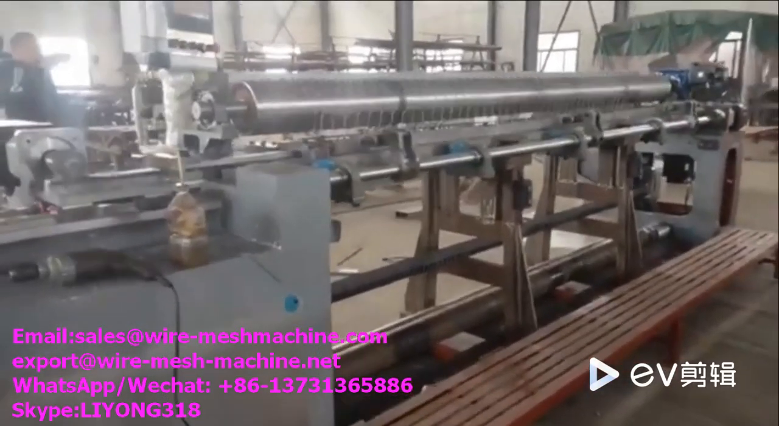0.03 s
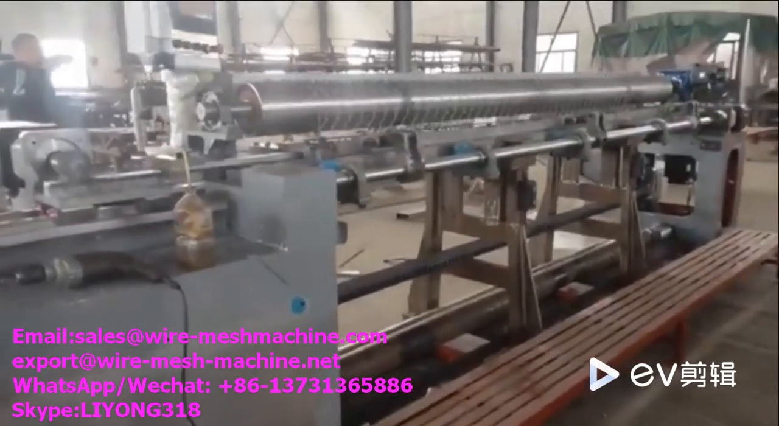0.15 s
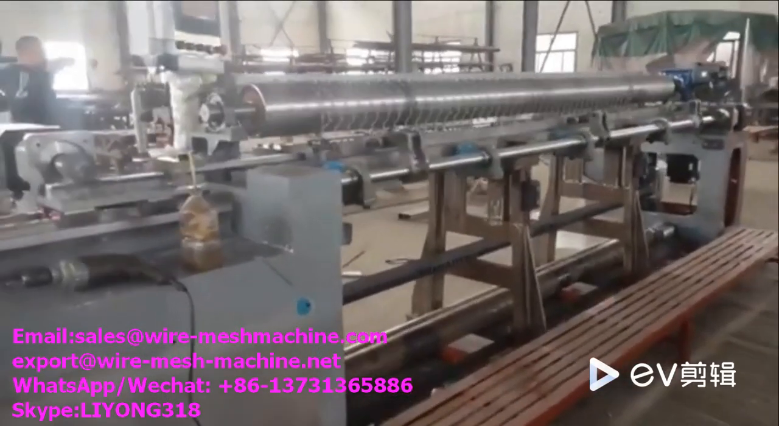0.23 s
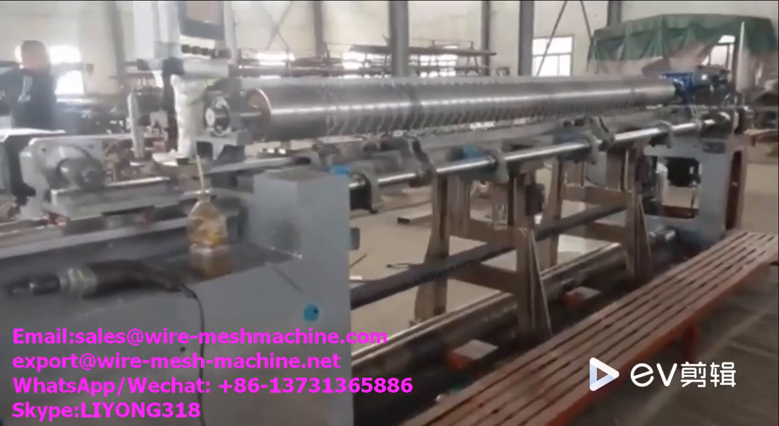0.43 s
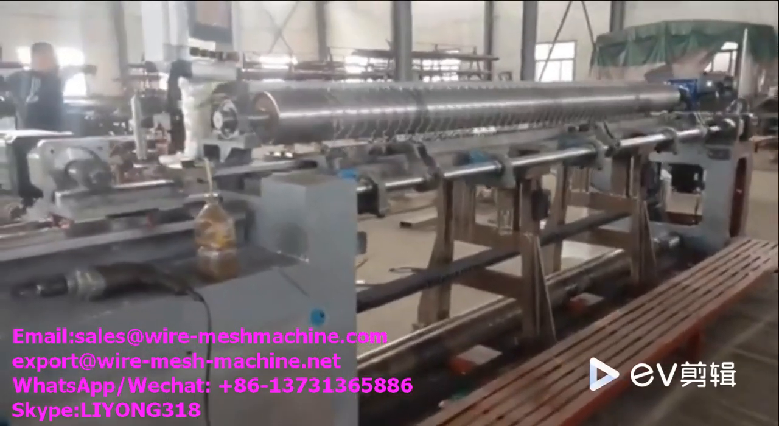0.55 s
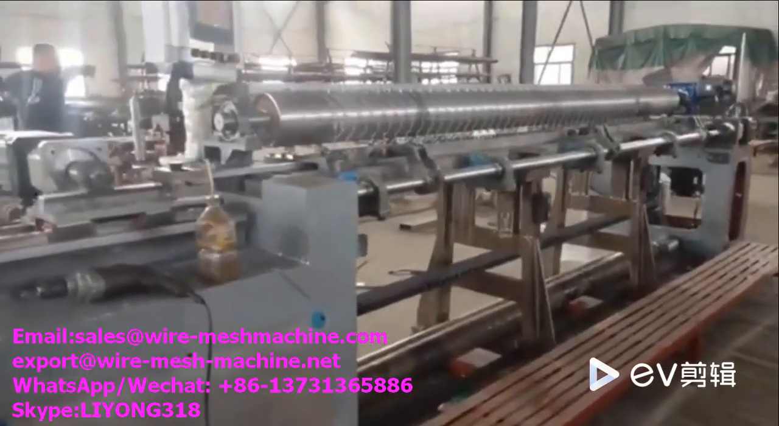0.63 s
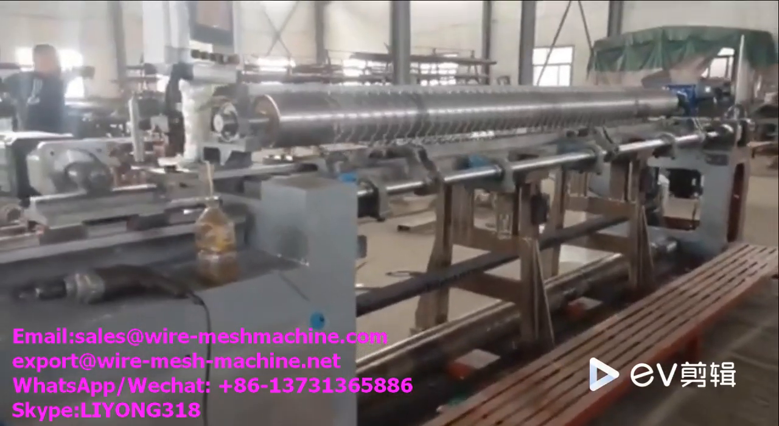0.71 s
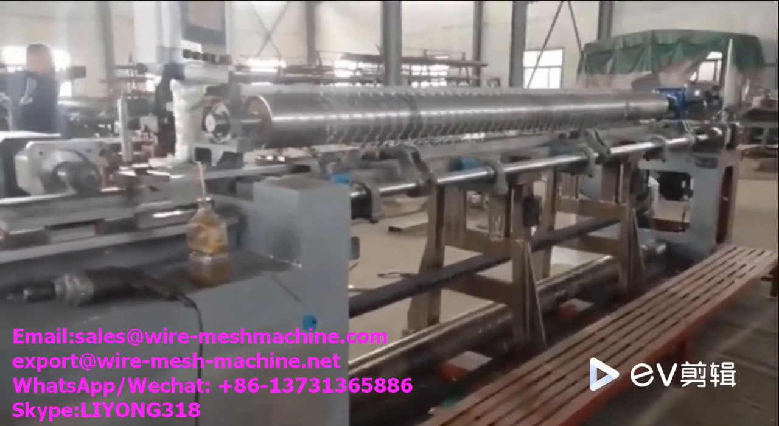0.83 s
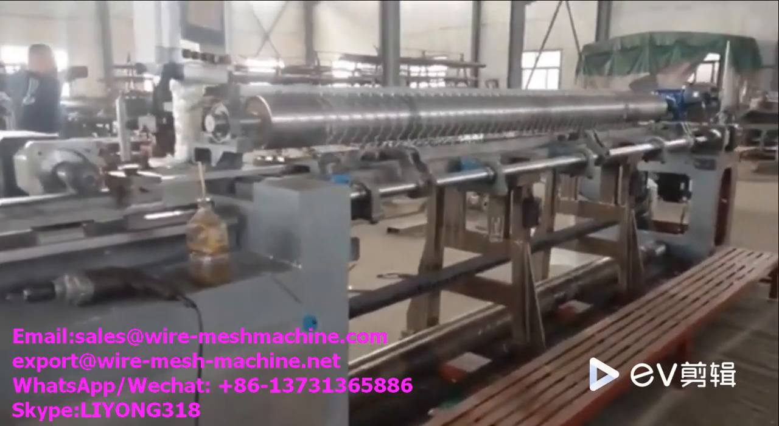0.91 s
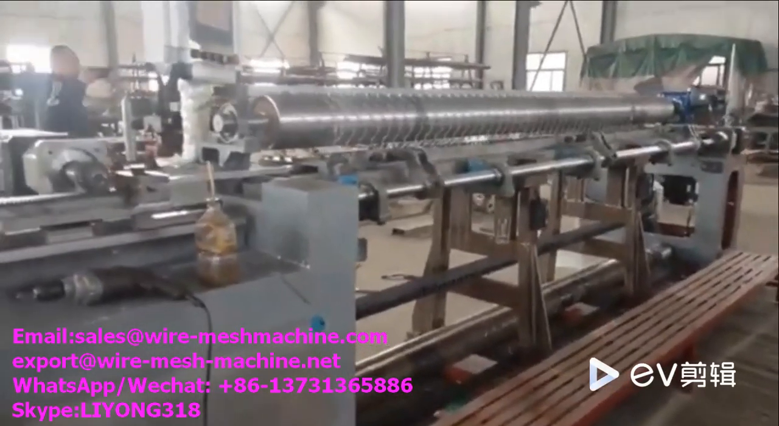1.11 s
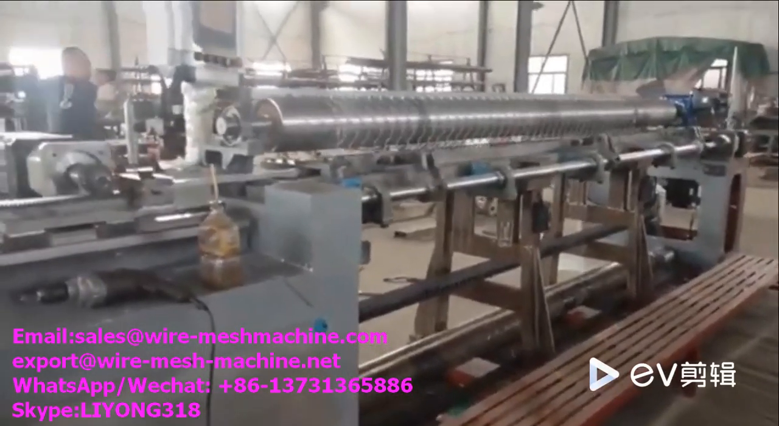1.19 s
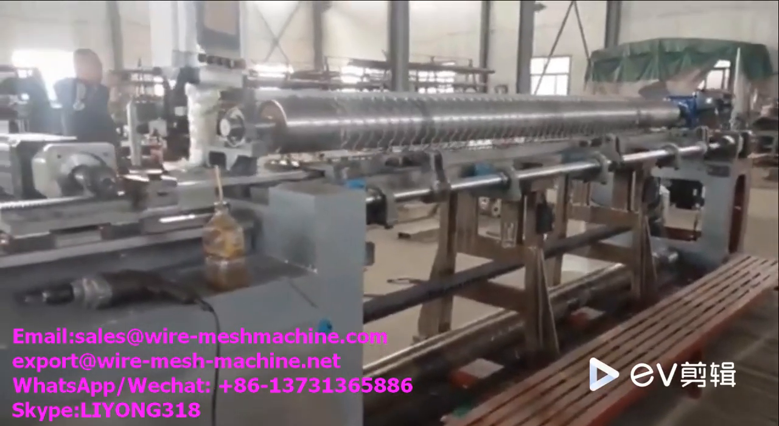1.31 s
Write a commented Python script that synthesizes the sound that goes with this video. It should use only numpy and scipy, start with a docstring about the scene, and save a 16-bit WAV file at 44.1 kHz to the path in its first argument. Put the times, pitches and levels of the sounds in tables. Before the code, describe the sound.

A pneumatic factory machine vents air in a large, echoing workshop. Distant motors hum and rumble throughout. Around 0.2 s a thin, unsteady high whistle chirps, swelling by 0.28 s into a harsh, hoarse air blast, loudest near 0.4 s, with a dull sliding rumble early on. At 0.59 s a heavy metallic thud lands; hiss stops by 0.75 s. Echoes decay, and a light double-knock rattles at 1.23 s.

```python
"""A large workshop hall hums over a deep rumble: coloured noise and wavering motor tones.
Then an air valve on a wire machine opens: it leaks, whistles (sine tones on moving pitches) and vents
a harsh jet (noise shaped by pipe resonances) until the piston thuds home and rings the machine frame.
The hall rings on as decaying noise, and a loose part knocks late."""
import sys
import numpy as np
from scipy import signal
from scipy.fft import rfft, irfft, next_fast_len
from scipy.io import wavfile
from scipy.ndimage import uniform_filter1d, map_coordinates

SR = 44100
rng = np.random.default_rng(int(sys.argv[2]) if len(sys.argv) > 2 else 0)


def put_to_file(sound):
    """Save the sound as 16-bit audio at rate SR, in the file named by the first command-line argument."""
    columns = np.atleast_2d(sound).T  # one column per channel
    safe = np.clip(columns, -1, 1)
    whole_steps = np.round(safe * 32767)
    wavfile.write(sys.argv[1], SR, whole_steps.astype(np.int16))


def voltage_ratio(decibels):
    """Convert decibels (scalar or array-like) to amplitude ratios, 20 dB per decade."""
    exponent = np.asarray(decibels, float) / 20
    return 10 ** exponent


N = 59535  # length in samples, 1.35 s


def unit(x):
    """Scale to rms 1."""
    return x / np.sqrt(np.mean(x ** 2) + 1e-20)


def along(points, hz):
    """Read a curve of (Hz, value) points on a log frequency axis."""
    point_hz, value = np.transpose(points)
    return np.interp(np.log(hz + 1), np.log(point_hz + 1), value)


def curves(rows):
    """One value per sample for each column after the time."""
    start_s, *columns = np.transpose(rows)
    return [np.interp(np.arange(N) / SR, start_s, column) for column in columns]


def wobble(rate):
    """A smooth random curve with rate knots a second."""
    knots = rng.standard_normal(int(N * rate / SR) + 4)
    return map_coordinates(knots, [np.arange(N) * rate / SR])


def filtered(x, response):
    """Multiply the spectrum of x by a response of frequency."""
    size = next_fast_len(N + SR // 2)
    return irfft(rfft(x, size) * response(np.fft.rfftfreq(size, 1 / SR)), size)[..., :N]


def smooth_patches(shape, bins, frames):
    """A random field over frequency and time, averaged into patches."""
    field = uniform_filter1d(rng.standard_normal(shape), size=bins, axis=0)
    return unit(uniform_filter1d(field, size=frames, axis=1))


def rush(spectrum, patchy_db):
    """Coloured noise of rms 1 with patches of random gain."""
    z = signal.stft(rng.standard_normal(N), nperseg=512)[2]
    patches = smooth_patches(z.shape, 5, 5)
    noise = signal.istft(z * voltage_ratio(patchy_db * patches), nperseg=512)[1][:N]
    return unit(filtered(noise, lambda hz: voltage_ratio(along(spectrum, hz))))


def narrow(hz, width):
    """Noise of rms 1 in one resonance, at half amplitude width Hz to either side."""
    return unit(filtered(rng.standard_normal(N), lambda f: 1 / (1 + ((f - hz) / width) ** 2)))


# colour of the far machines' roar: (pitch_hz, relative level_db per Hz)
HUM = [(15, -62), (25, -31), (59, -8.5), (178, -10), (229, -9), (254, -9), (327, -7), (505, -10),
       (685, -17), (862, -9.5), (1170, -17.5), (4180, -30), (4510, -38.5), (6960, -24), (11000, -50.5),
       (14300, -76), (22000, -120)]
# steady motor tones: (pitch_hz, drift_hz, level_db before the fade below)
MOTORS = [(227.4, 3.23, -56.5), (835.6, 2.63, -56.5)]
# far whine: (pitch_hz, width_hz, level_db before the fade below)
WHINE = (6550, 250, -68)
# deep rumble, lowered by RUMBLE_TRIM_DB: (start_s, level_db)
RUMBLE = [(0.0, -39.5), (0.036, -51.5), (0.566, -54), (0.604, -39.5), (0.816, -55), (0.924, -44.5),
          (1.35, -50.5)]
# slow rise and fall of the hum: (start_s, roar gain_db, motor and whine gain_db)
HUM_FADE = [(0, -0.5, -0.5), (.25, 2, 3.5), (.45, -3, -4.5), (1.1, 1, -4), (1.35, -6.5, -7)]
HUM_DB, RUMBLE_TRIM_DB = -45.5, -3.5


def hum():
    """Far machines: a noise roar, two wavering motor tones, a whine and a rumble that comes and goes."""
    roar = voltage_ratio(HUM_DB + 0.67 * wobble(5.95)) * rush(HUM, patchy_db=2.5)
    tones = voltage_ratio(WHINE[2]) * narrow(*WHINE[:2])
    for hz, drift_hz, level_db in MOTORS:
        phase = 2 * np.pi * np.cumsum(hz + drift_hz * wobble(15.34)) / SR
        tones = tones + np.sqrt(2) * voltage_ratio(level_db + 2.3 * wobble(12.1)) * np.sin(phase)
    rumble_db, = curves(RUMBLE)
    rumble_colour = [(20, -32), (40, -5.5), (75, -2), (110, -7), (200, -28), (400, -87)]  # (Hz, dB)
    deep = rush(rumble_colour, patchy_db=-2.5)
    roar_db, tones_db = curves(HUM_FADE)
    return voltage_ratio(roar_db) * roar + voltage_ratio(tones_db) * tones + voltage_ratio(rumble_db + RUMBLE_TRIM_DB) * deep


# how long the hall rings: (pitch_hz, time to fall 60 dB in s)
HALL = [(100, 6.7), (300, 2.17), (1000, 3.36), (3000, 1.81), (6500, 1.21), (11000, 2.13)]
HALL_DELAY_S = 0.02


def hall(x):
    """Echoes blur into a noise tail in which each frequency dies at its own speed."""
    hz, t, z = signal.stft(rng.standard_normal(N), SR, nperseg=256)
    decay = voltage_ratio(-60 * t / along(HALL, hz)[:, None])
    tail = signal.istft(z * decay, SR, nperseg=256)[1]
    delayed = np.pad(x, (round(HALL_DELAY_S * SR), 0))
    return signal.fftconvolve(delayed, tail / np.linalg.norm(tail))[:N]


# the piston rumbles along: (start_s, level_db)
SLIDE = [(.18, -83), (.21, -44), (.28, -43), (.36, -44), (.44, -61.5), (.58, -66), (.6, -88)]
# colour of that rumble: (pitch_hz, relative level_db per Hz)
SLIDE_COLOUR = [(40, -32), (100, -6), (280, 1), (500, -8), (900, -11.5), (1500, -30), (3000, -90)]


def piston():
    """The travelling piston makes a dull, lumpy rumble of low noise."""
    level_db, = curves(SLIDE)
    return voltage_ratio(level_db + 1.2 * wobble(31.7)) * rush(SLIDE_COLOUR, patchy_db=2.5)


# blows on the machine frame: (start_s, level_db, rise_s, brightness_db per octave)
BLOWS = [(.586, -24, 0.0022, 2), (.645, -33, 0.0056, -1), (1.222, -40.5, .004, -0.5),
         (1.231, -37, 0.0022, 2.5), (1.243, -37.5, 0.0064, -1.5)]
# ringing modes of the frame: (pitch_hz, level_db within the blow, time to fall 60 dB in s)
FRAME = [(149.5, -7, 0.15), (231.4, -1.5, 0.075), (281.6, -1, 0.18), (321.5, -0.5, 0.088),
         (612, -3.5, 0.051), (800, -6, 0.02), (1122, -9, 0.044), (1675, 1.5, 0.029), (4620, -15, 0.035)]
# colour of the thump: (pitch_hz, relative level_db per Hz)
THUMP = [(60, -16), (150, 5.5), (300, 6), (700, 1), (1500, -8), (4000, -23), (8000, -35.5)]
THUMP_DB, THUMP_T60_S, THUMP_LAG_S = -1.5, 0.24, 0.006
LOW_LAG_CYCLES = 3.5  # slow bending waves: a mode starts this many of its cycles after the blow


def frame():
    """Each blow rings the frame's modes, the low ones later, over a dull thump of noise."""
    out, t = np.zeros(N + SR), np.arange(SR // 2) / SR
    for start_s, level_db, rise_s, tilt_db in BLOWS:
        ring = 0
        for hz, mode_db, t60_s in FRAME:
            since = np.maximum(t - LOW_LAG_CYCLES / hz, 0)
            bright_db = mode_db + tilt_db * np.log2(hz / 300)
            shape = voltage_ratio(bright_db - 60 * since / t60_s) * (1 - np.exp(-since / rise_s))
            ring = ring + shape * np.sin(2 * np.pi * (hz * since + rng.random()))
        colour = [(hz, db + tilt_db * np.log2(hz / 300)) for hz, db in THUMP]
        noise = rush(colour, patchy_db=2.5)[:len(t)]
        since = np.maximum(t - THUMP_LAG_S, 0)
        thump = voltage_ratio(THUMP_DB - 60 * since / THUMP_T60_S) * (1 - np.exp(-since / rise_s)) * noise
        out[round(start_s * SR):][:len(t)] += voltage_ratio(level_db) * (ring + thump)
    return out[:N]


# whistle of the half-open seat: (start_s, pitch_hz, level_db, octave level_db)
WHISTLE = [(.182, 3280, -77, -82), (.19, 3314, -49, -52), (.2, 3290, -34.5, -39), (.21, 3325, -38.5, -36.5),
           (.225, 3240, -34, -41), (.24, 3333, -42, -34), (.247, 3340, -64, -70), (.255, 3230, -80, -93)]
# second whistle, at the outlet: (start_s, pitch_hz, level_db)
OUTLET = [(.205, 3220, -81), (.218, 3208, -24), (.23, 3220, -29), (.24, 3120, -42), (.262, 3200, -35),
          (.277, 3320, -38), (.29, 3140, -24.5), (.3, 3360, -80)]
UNDERTONE_DB = -15.5  # over the seat whistle, at half its pitch


def whistles():
    """Two close, unsteady edge tones that beat; the seat's has an octave and a faint undertone."""
    hz, level_db, octave_db = curves(WHISTLE)
    phase = 2 * np.pi * np.cumsum(hz + 8 * wobble(110.5)) / SR
    seat = voltage_ratio(level_db) * np.sin(phase)
    seat = seat + voltage_ratio(octave_db) * np.sin(2 * phase)
    seat = seat + voltage_ratio(level_db + UNDERTONE_DB) * np.sin(phase / 2)
    hz, level_db = curves(OUTLET)
    outlet = voltage_ratio(level_db) * np.sin(2 * np.pi * np.cumsum(hz + 6 * wobble(82)) / SR)
    return np.sqrt(2) * (seat + outlet)  # sine levels are rms


# the outlet keeps singing hoarsely inside the jet: (start_s, pitch_hz, level_db over the jet's noise)
SINGING = [(0.29, 2928, -4.5), (0.334, 3200, -0.5), (0.372, 2991, -8), (0.468, 3070, -6), (0.51, 2945, -6),
           (0.524, 3115, -7), (0.572, 3005, -25), (0.612, 3318, -5.5), (0.662, 3245, -10),
           (0.68, 2953, -0.5)]
SINGING_WIDTH_HZ = 58


def singing():
    """Narrow noise riding on a wandering pitch, rms 1 at 0 dB."""
    hz, level_db = curves(SINGING)
    phase = 2 * np.pi * np.cumsum(hz) / SR
    cos_part = narrow(0, SINGING_WIDTH_HZ) * np.cos(phase)
    sin_part = narrow(0, SINGING_WIDTH_HZ) * np.sin(phase)
    return voltage_ratio(level_db) * (cos_part + sin_part)


# air flow at the valve: (start_s, jet level_db before JET_TRIM_DB,
# then gains over the jet's core: upper hiss_db, lower roar_db, topmost fizz_db)
FLOW = [(.14, -92, 1, 0, 10), (.15, -64.5, 19.5, 0, 29), (.2, -56.5, 6, 9, 22.5), (.235, -53, 7, -9, 15),
        (.25, -37.5, 7, 4, 20.5), (.265, -38.5, 4.5, 0, 12), (.28, -26, -3.5, -1, 4.5),
        (.32, -26.5, -2, 1.5, -4), (.36, -23, -3, -1, 2), (.4, -19.5, -3, -4, -4.5),
        (.46, -24, 1.5, 2, 5.5), (.5, -24, 0.5, -2, -38), (.54, -22, -3, -2, -5), (.6, -30, -0.5, 2.5, 2),
        (.66, -27.5, 0.5, -1, -1), (.7, -38.5, 3, -15, 5), (.76, -78, -10, 13, -3)]
# colour of the jet: (pitch_hz, relative level_db per Hz)
JET = [(410, -68), (700, -18.5), (909, -16), (1440, -7.5), (2410, -9), (3050, 0), (3740, -10.5),
       (4060, -35), (4310, -16), (4970, -14.5), (6080, -7.5), (7180, -7.5), (9320, -33.5), (10100, -25),
       (12000, -44.5), (15500, -69), (22000, -120)]
# weaker pipe resonances: (pitch_hz, width_hz, level_db over the jet's noise)
STRANDS = [(1484, 40, -15.5), (1657, 39, -19.5), (1928, 57, -18.5), (6246, 62, -17.5)]
JET_TRIM_DB = -2.5
LOW_SPLIT_HZ, HIGH_SPLIT_HZ, FIZZ_SPLIT_HZ = 2300, 4100, 8300


def jet():
    """Turbulent air through the outlet's resonances; roar, hiss and fizz shift as the flow changes."""
    level_db, hiss_db, roar_db, fizz_db = curves(FLOW)
    air = rush(JET, patchy_db=2.5) + singing()
    for hz, width_hz, strand_db in STRANDS:
        air = air + voltage_ratio(strand_db + 1.8 * wobble(14.2)) * narrow(hz, width_hz)

    def band(low, high):
        """The part of the air noise between two frequencies."""
        return filtered(air, lambda hz: (hz >= low) & (hz < high))

    roar = voltage_ratio(roar_db) * band(0, LOW_SPLIT_HZ)
    core = band(LOW_SPLIT_HZ, HIGH_SPLIT_HZ)
    hiss = voltage_ratio(hiss_db + 0.77 * wobble(19.75)) * band(HIGH_SPLIT_HZ, FIZZ_SPLIT_HZ)
    fizz = voltage_ratio(fizz_db) * band(FIZZ_SPLIT_HZ, SR)
    flutter_db = 0.61 * wobble(149.7) + 0.59 * wobble(23.74)
    return voltage_ratio(level_db + JET_TRIM_DB + flutter_db) * (roar + core + hiss + fizz)


HALL_AIR_DB, HALL_BLOWS_DB = -5, -3.5  # how strongly each feeds the hall


def scene():
    """Air and machine heard directly and through the hall, over the hum."""
    air = jet() + whistles()
    blows = frame() + piston()
    echo = hall(voltage_ratio(HALL_AIR_DB) * air + voltage_ratio(HALL_BLOWS_DB) * blows)
    return (air + blows + echo + hum())[None]


# how far the treble flickers: (pitch_hz, depth_db per unit of the random field)
FLICKER = [(3000, 0), (4200, 4), (5500, 3), (7500, 2.5), (9000, 6), (12000, 6)]


def flicker(x):
    """The treble flickers in patches a few hundred Hz wide and some 50 ms long."""
    hz, t, z = signal.stft(x, SR, nperseg=1024)
    field = np.clip(smooth_patches(z.shape[1:], 8, 4), -2.5, 1.3)  # dips go deeper than peaks
    gain = voltage_ratio(along(FLICKER, hz)[:, None] * field)
    return signal.istft(z * gain, SR, nperseg=1024)[1][:, :N]


def band_limit(x):
    """A steep low-pass at the top of the band."""
    return signal.sosfilt(signal.butter(12, 12110, fs=SR, output="sos"), x)


TOP_HZ = 12100
AGC_KNEE_DB, AGC_SHARE, AGC_S = -37.5, 0.1, 0.3  # threshold, share of the excess removed, averaging time


def record(dry):
    """A band-limited phone microphone and a mild gain control that follows the loudness."""
    x = filtered(flicker(dry), lambda hz: hz < TOP_HZ)
    power = np.abs(uniform_filter1d(x ** 2, round(AGC_S * SR)))
    loud_db = 10 * np.log10(power + 1e-12)
    mix = x * voltage_ratio(-AGC_SHARE * np.maximum(loud_db - AGC_KNEE_DB, 0))
    return band_limit(mix)


dry = scene()
out = record(dry)
put_to_file(out)
```